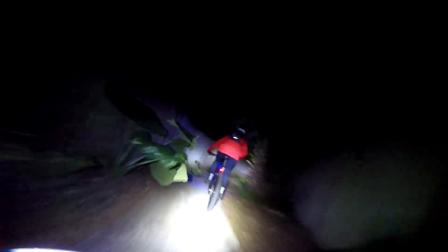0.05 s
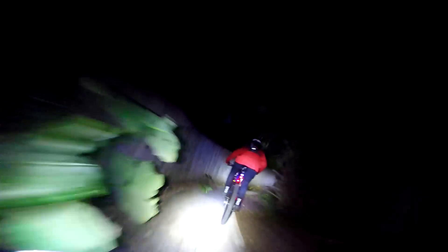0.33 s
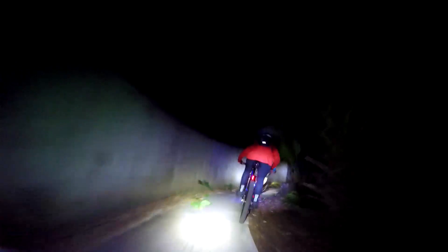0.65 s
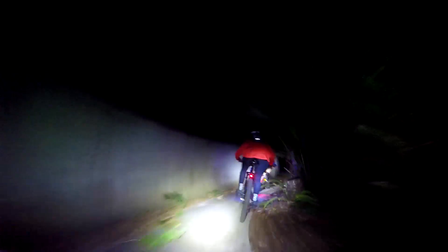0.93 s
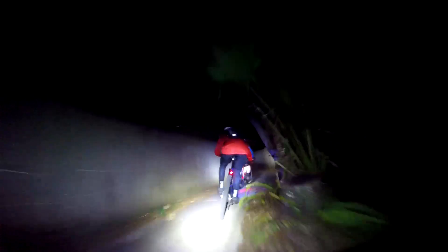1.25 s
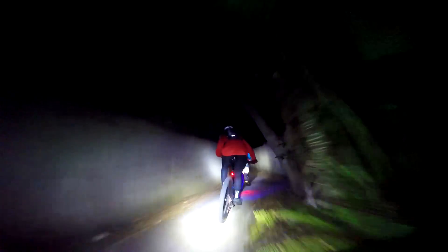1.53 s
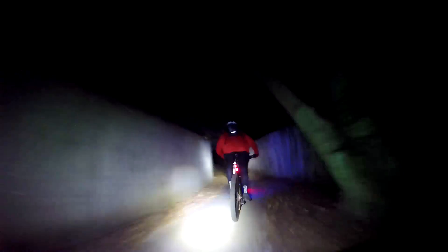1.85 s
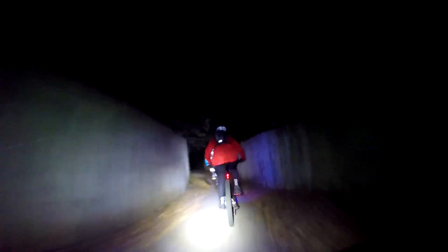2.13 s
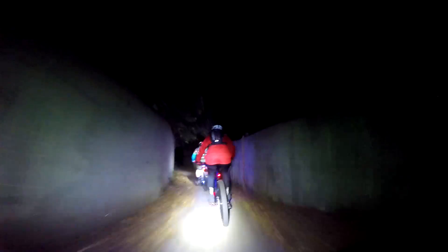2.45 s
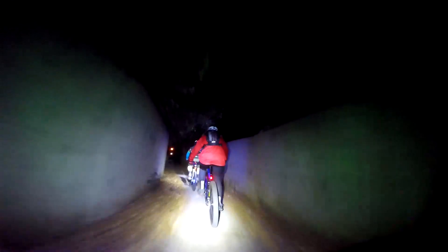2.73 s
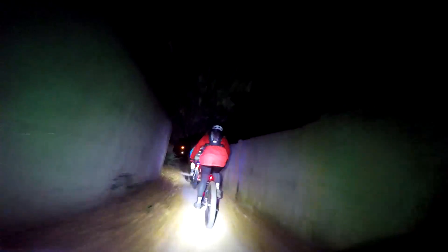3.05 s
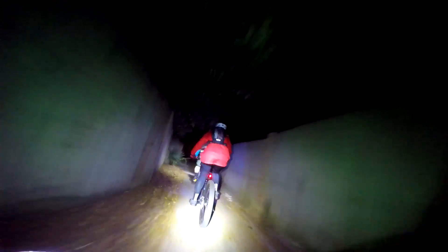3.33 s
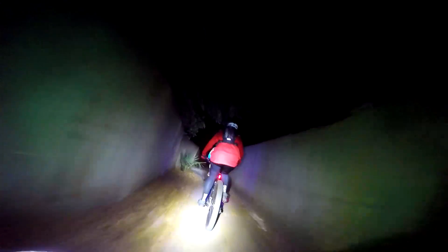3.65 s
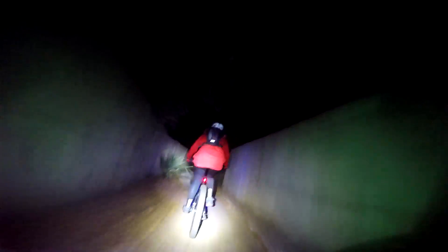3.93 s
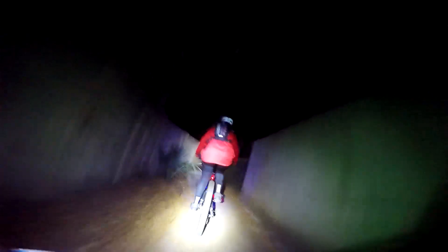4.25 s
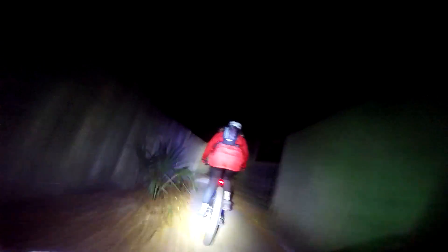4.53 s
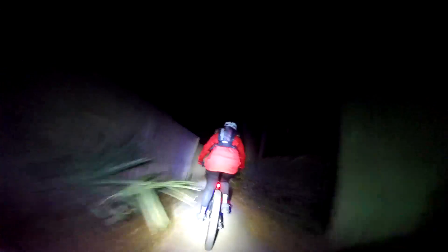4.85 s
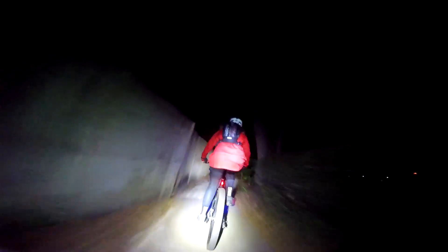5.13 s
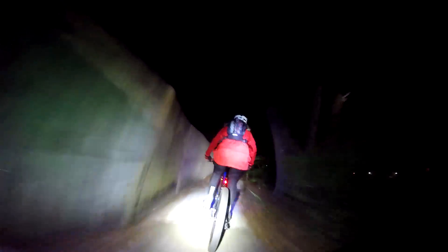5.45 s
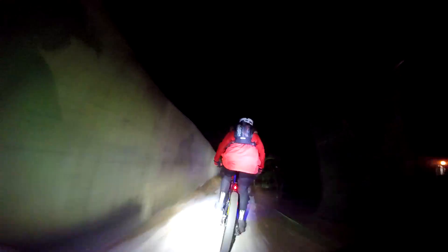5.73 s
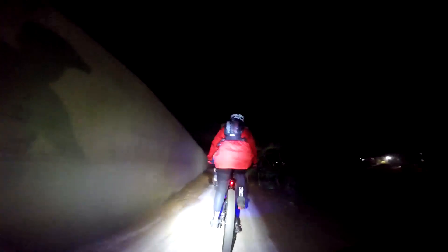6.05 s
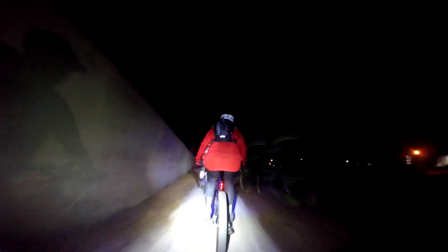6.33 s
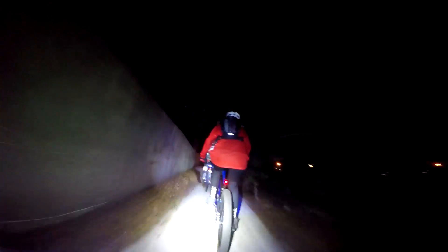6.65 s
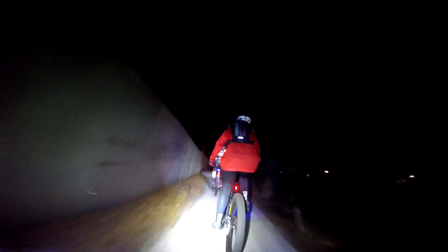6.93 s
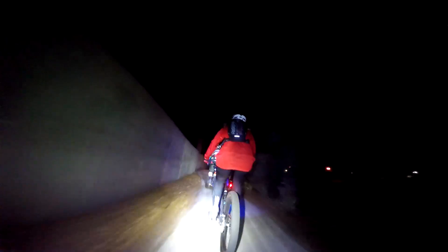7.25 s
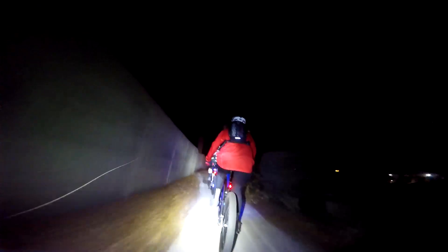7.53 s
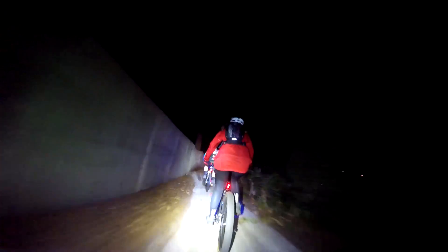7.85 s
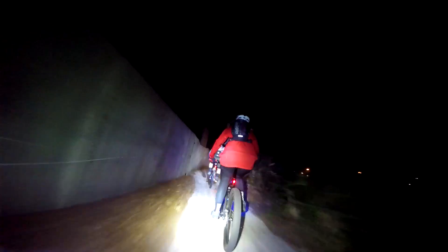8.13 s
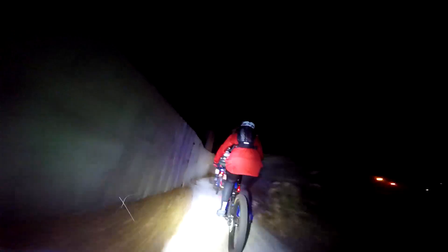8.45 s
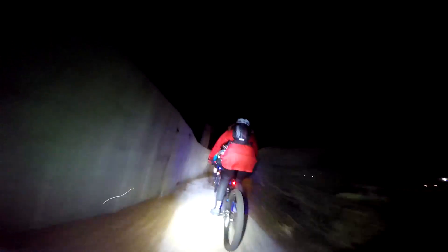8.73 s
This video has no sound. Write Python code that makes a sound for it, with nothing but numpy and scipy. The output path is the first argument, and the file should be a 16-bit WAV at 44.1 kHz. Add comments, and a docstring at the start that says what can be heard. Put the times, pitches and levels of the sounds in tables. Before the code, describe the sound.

A mountain bike rolls fast over damp paving, knobby tyres humming, with thudding bumps, gear clicks and wind rumbling on the microphone.

```python
"""On a damp paved path between concrete walls, a mountain bike rolls fast, heard from its handlebar.
Knobby tyres force the frame into vibration and fling off a hiss of spray; the freehub's pawls buzz,
and turbulent air buffets the microphone. Impacts excite damped modes: bumps thud, grit ticks, loose
parts clatter, the gears shift and the frame knocks. Friction adds the swish of passing plants and
one scrape of a brake rotor."""
import sys
import numpy as np
from scipy.fft import rfft, irfft, next_fast_len
from scipy.io import wavfile
from scipy.ndimage import uniform_filter1d, minimum_filter1d, map_coordinates

SR = 44100
rng = np.random.default_rng(int(sys.argv[2]) if len(sys.argv) > 2 else 0)


def materialize(psi):
    """Save the field psi as 16-bit PCM at rate SR to the path in sys.argv[1].

    A 1-D psi becomes a single channel; in a 2-D psi each row is a channel.
    """
    bounded = np.clip(np.atleast_2d(psi).T, -1, 1)
    quanta = np.round(bounded * 32767).astype(np.int16)
    wavfile.write(sys.argv[1], SR, quanta)


N = 392490

ROLLING = [(0, -29), (0.15, -31), (0.51, -29.5), (0.53, -44), (0.7, -39.5), (1.05, -35.5), (1.25, -39.5),
           (1.55, -34.5), (2.25, -34.5), (2.85, -29), (3.25, -31.5), (4.14, -28.5), (4.17, -38.5),
           (4.85, -36), (5.24, -31.5), (5.27, -41.5), (5.8, -35.5), (6.7, -29.5), (7.4, -28.5),
           (7.55, -32.5), (8.1, -30.5), (8.88, -29.5)]  # how hard the tyres work the ground: t/s, level/dB
TREAD = [(0, 110.6, 15), (1.4, 137, -15.5), (2.3, 103, -16.5), (3.1, 111, 7.5), (3.9, 137, 1),
         (4.4, 136, 2.5), (5.5, 132, 2), (6.3, 129.7, 3.5), (7.2, 128, 9), (8.1, 132, 6.5),
         (8.9, 123, -12.5)]  # knob impacts: t/s, nominal rate/Hz, relative hum level/dB
KNOB_HARMONICS = [-3.5, -2.5, -12, -9, -10.5, -10]  # knob force at harmonics 1-6: level/dB
ANTIRESONANCES = [(118, 3.6), (243, 7.7), (481, 9.8)]  # where the frame barely responds: f/Hz, width/Hz
BOOM_MODES = [(46, 6, -7), (72, 14, -10), (104, 8, 1), (131, 9, -5), (145, 15, 3), (165, 20, -3),
              (205, 30, -13.5)]  # low resonances of frame, fork and tyre: f/Hz, width/Hz, level/dB
DRONE_MODES = [(258.8, 11, -0.5), (284, 23, -4), (325.5, 55, -14), (429, 34.4, -11.5), (522, 30, -5.5),
               (550, 26, -11), (662, 61, -15), (799, 37, -10), (1037, 100, -13.5), (1128, 57, -18)]  # their upper resonances: f/Hz, width/Hz, level/dB
BOOM_LEVEL = [(0, -18.5), (0.45, -15), (0.75, -25.5), (1.0, -18.5), (1.35, -25), (1.6, -20), (2.5, -19),
              (2.8, -16), (3.4, -21), (3.9, -14.5), (4.03, -18.5), (4.13, -16), (4.3, -21.5), (5.2, -19),
              (5.9, -23.5), (6.25, -19), (6.7, -15), (7.8, -18), (8.2, -16), (8.35, -20.5), (8.8, -14)]  # low boom, following the unevenness of the paving: t/s, level/dB
DRONE_LEVEL = [(0, -26), (0.27, -24), (0.51, -27.5), (0.56, -32.5), (1.0, -32.5), (1.3, -33.5), (2.1, -30),
               (2.65, -33), (2.85, -24.5), (2.98, -29), (3.2, -28), (3.5, -21.5), (3.77, -26),
               (4.14, -22.5), (4.19, -32.5), (4.9, -33), (5.13, -24.5), (5.3, -32.5), (5.7, -27.5),
               (5.82, -29), (6.1, -26.5), (6.86, -21.5), (7.55, -23), (8.1, -21), (8.88, -24.5)]  # the tread's drone in the frame: t/s, level/dB
# the tread's whine, swelling as the wheel turns and flaring at hard knocks to the frame: t/s, level/dB
WHINE_LEVEL = [(0.0, -44), (0.17, -37), (0.3, -41), (0.49, -34), (0.59, -57), (0.72, -48), (0.94, -41),
               (1.26, -51), (1.36, -38), (1.41, -51), (1.58, -37), (1.68, -45), (2.3, -43), (2.85, -34.5),
               (3.0, -44), (3.05, -28.5), (3.15, -41.5), (4.14, -35), (4.19, -50), (4.51, -48),
               (4.54, -36.5), (4.64, -47.5), (5.23, -41), (5.28, -50), (5.87, -40.5), (7.46, -37),
               (7.51, -44), (7.98, -39.5), (8.03, -34), (8.33, -42), (8.35, -48), (8.4, -31.5), (8.7, -44),
               (8.9, -37)]
RUSH_SPECTRUM = [(300, -32.5), (600, 1.5), (900, 1), (1050, -6), (1350, -7), (1650, -14), (2200, -15),
                 (4000, -48)]  # tread slapping the ground: f/Hz, level/dB
WHINE_HZ, WHINE_HALF_WIDTH_HZ = 546, 62
LOAD_SWAY, LOAD_SWAY_HZ = 0.009, 5  # fractional pitch deviation; its rate

THROW = [(0, -48.5), (0.51, -52.5), (0.53, -58), (1.0, -54), (1.22, -56), (1.4, -52), (1.9, -49.5),
         (2.05, -62), (2.97, -56.5), (3.06, -51.5), (3.25, -50.5), (3.5, -46.5), (4.14, -45), (4.17, -54),
         (5.12, -50.5), (5.24, -54.5), (5.27, -61.5), (5.5, -59.5), (5.88, -57), (5.94, -54.5), (6.75, -52),
         (7.7, -55.5), (8.05, -50), (8.5, -54), (8.88, -50)]  # water and sand thrown by the tread: t/s, level/dB
SCRUB_SPECTRUM = [(1000, -13.5), (1700, -7.5), (2100, -4), (2420, 0), (2680, -4), (3050, -5.5), (3450, -10),
                  (4300, -13.5), (6000, -16), (11000, -48.5)]  # sand under the tread: f/Hz, level/dB
SPRAY_SPECTRUM = [(3000, -36.5), (4400, -19.5), (4950, -2), (5300, 0.2), (5850, -0.5), (6200, -3),
                  (6520, 0.5), (6900, -3.5), (7600, -7.5), (8600, -29.5)]  # flying droplets: f/Hz, level/dB
MIST_SPECTRUM = [(6500, -30), (7800, -3), (8500, -1), (9400, -2), (9900, -7.5), (10350, -7.5),
                 (11100, -24.5), (11800, -42)]  # fine mist: f/Hz, level/dB

COASTS = [(0, 0.512, -53.5), (3.05, 4.15, -55), (4.45, 5.25, -62)]  # spells of freehub buzz: start/s, end/s, level/dB
HUB_MODES = [(1395, 40, 6), (2400, 100, 1.5), (6700, 170, -1), (10000, 170, -17)]  # resonances of the hub shell: f/Hz, width/Hz, level/dB
PAWL_HZ, PAWL_FADE_DB = 252, 15  # tick rate; fall of each tick before the next

BREEZE = [(0, -25.5), (1.0, -36), (1.45, -35), (2.1, -26.0), (2.6, -32), (3.3, -29.5), (5.2, -30),
          (5.9, -37), (6.7, -26.5), (8.3, -33), (8.88, -33.5)]  # steady airflow on the microphone: t/s, level/dB
GUSTS = [(0.57, -13), (0.79, -16), (1.19, -10), (1.62, -18), (2.0, -9), (2.24, -13), (3.14, -11.5),
         (3.66, -23), (4.21, -9.5), (4.42, -11), (4.9, -8.5), (5.31, -12.5), (5.52, -17), (6.08, -22),
         (6.37, -16), (6.58, -12.5), (6.78, -15), (7.47, -10.5), (7.66, -17), (8.52, -18), (8.74, -15)]  # single eddies, most at a jolt: t/s, level/dB
BUFFET_SPECTRUM = [(8, -45), (17, -6.5), (25, 1.5), (36, -3), (46, 13.5), (56, -19.5), (90, -13),
                   (200, -32), (600, -92.5)]  # turbulent pressure: f/Hz, level/dB

BUMPS = [(0.215, -8, 161.5, -22, -52), (0.539, -6.5, 139.3, -15, -33), (0.555, -6.5, 105, -11, -60),
         (1.175, -4.5, 139, -14, -39), (1.525, -9.5, 154, -16, -48), (1.87, -6.5, 150, -17, -40),
         (1.98, -4, 164.5, -14, -55), (2.019, -1.5, 97, -11, -37), (2.092, -4.5, 206, -12, -33.5),
         (2.625, -8.5, 142, -22, -55), (2.865, -10, 200, -22, -51), (3.036, -3.5, 218, -25, -30),
         (3.126, -4, 163, -18, -39), (4.2, -9.5, 157, -4, -39), (4.416, -12.5, 188, -3, -33),
         (4.894, -11.5, 106.5, -16, -51), (5.293, -6, 142, -19, -34), (6.362, -4.5, 148, -8, -57),
         (6.68, -10, 142, -17, -54), (7.01, -4.5, 150, -11, -51), (7.095, -8, 140, -18, -56),
         (7.21, -4, 141, -18, -52), (7.385, -2.5, 146.5, -16, -43), (7.479, -6, 175, -14, -54),
         (7.635, -3, 147, -17, -38), (7.93, -7, 143, -16, -49), (8.115, -10.5, 170, -20, -50),
         (8.178, -9, 159, -18, -37), (8.21, -4, 136, -16, -55), (8.409, -8, 214.7, -24, -35),
         (8.497, -3.5, 148.5, -5, -39)]  # jolts: t/s, level/dB, tyre f/Hz, relative fork heave/dB, rattle/dB
SLAB_EDGES = [(0.509, 0.522, -8), (4.156, 4.184, -3), (5.248, 5.28, -3.5)]  # the tyre skips off an edge: lift/s, landing/s, gain/dB
SNAPS = [(0.51, -12), (5.247, -28)]  # dead snaps as the tyre lifts: t/s, level/dB
GRIT = [(.517, -41, 0.013), (.557, -39, 0.02), (1.876, -37.5, .02), (2.188, -44, 0.035), (2.371, -45, .03),
        (3.015, -40, 0.033), (3.1015, -30.5, 0.004), (3.189, -39, 0.022), (3.706, -38, 0.03),
        (3.7745, -41, .015), (4.0994, -33, 0.025), (4.272, -40, .012), (6.893, -41, 0.02),
        (7.705, -42.5, .05)]  # stones flicked against the frame: t/s, level/dB, T60/s
CLATTERS = [(0.541, -39), (1.876, -30), (2.021, -51), (4.198, -47), (4.272, -41), (5.218, -46),
            (5.292, -42.5)]  # loose parts set chattering: t/s, level/dB
CLATTER_GAP_S, CLATTER_LOSS_DB, CLATTER_T60_S = 0.0045, 5.5, 0.018  # typical values per contact

LEVER_CLICKS = [(.765, -24), (1.394, -20.5), (1.931, -32), (2.322, -29.5), (3.014, -34), (4.185, -31.5),
                (4.391, -24.5), (5.091, -28), (5.4855, -23)]  # the shifter lever snaps: t/s, level/dB
LEVER_MODES = [(865, 3, 0.034), (1143, 5.5, 0.014), (1240, -5, 0.013), (1380, -4, 0.02)]  # modes of the lever: f/Hz, level/dB, T60/s
CHAIN_DROPS = [(.801, -12), (4.422, -7), (5.519, -11)]  # the chain lands on a cog: t/s, level/dB
DRIVETRAIN_MODES = [(228, 1, 0.056), (340, 0, 0.05), (431, -3, 0.058), (580, -6, 0.03), (770, -3, 0.03),
                    (830, 1, 0.045), (1194, -13, 0.03), (1370, -7, 0.016)]  # modes of the drivetrain: f/Hz, level/dB, T60/s

SWISHES = [(1.894, -53, 0.016), (2.792, -42.5, 0.013), (3.077, -43.5, 0.0033), (4.783, -45, 0.01),
           (4.849, -44, .007), (4.892, -43, 0.015), (5.013, -47, 0.0045), (6.718, -46, 0.0065)]  # plants brush the bike: t/s, level/dB, half-length/s
KNOCKS = [(3.039, -25), (8.184, -34), (8.409, -17)]  # hard jolts to the frame: t/s, level/dB
TUBE_MODES = [(410, -9, .04), (596, 1, 0.13), (748, 0, 0.064), (1068, -3.5, 0.05), (1220, -7, .035)]  # modes of the frame tubes: f/Hz, level/dB, T60/s
PAD_GRAZES = [(5.378, -58)]  # a brake pad touches its rotor: t/s, level/dB
ROTOR_MODES = [(1925, 5, .6), (2360, -4, .3), (2760, 14, .05), (2930, 0, .15), (3714, -5, 0.25)]  # modes of the steel disc: f/Hz, level/dB, T60/s
CEILING, TOP_HZ = 0.82, 11600  # the limiter's threshold and the camera's band limit


def amp(db):
    """Amplitude ratio of a level in decibels."""
    return 10 ** (np.asarray(db) / 20)


def unit(x):
    """Normalisation to rms 1."""
    return x / np.sqrt(np.mean(x ** 2) + 1e-20)


def even(x, seconds):
    """Normalisation to a running rms of 1; faster flutter remains."""
    return x / np.sqrt(np.abs(uniform_filter1d(x * x, max(int(seconds * SR), 2))) + 1e-20)


def curves(rows):
    """Linear interpolation, sample by sample, of each column after the time."""
    s, *cols = np.transpose(rows)
    return [np.interp(np.arange(N) / SR, s, c) for c in cols]


def swing(rows):
    """Decomposition of a level curve into its mean and its deviation, in dB."""
    db, = curves(rows)
    return db.mean(), db - db.mean()


def wobble(hz):
    """Smooth random modulation: a spline through hz random knots a second."""
    knots = rng.standard_normal(int(N * hz / SR) + 4)
    grid = np.arange(0, len(knots) - 1, 1 / 16)
    return np.interp(np.arange(N) * hz / SR, grid, map_coordinates(knots, [grid]))


def swell(s, rise_s, fall_s):
    """Exponential growth to 1 at time s, then exponential decay."""
    t = np.arange(N) / SR
    return np.exp(-np.minimum(np.maximum((s - t) / rise_s, (t - s) / fall_s), 20))


def noise():
    """White Gaussian noise."""
    return rng.standard_normal(N)


def filtered(x, response):
    """Linear filtering: the spectrum of x times a frequency response."""
    size = next_fast_len(N + SR // 2)
    return irfft(rfft(x, size) * response(np.fft.rfftfreq(size, 1 / SR)), size)[:N]


def colour(x, points):
    """Spectral shaping by a curve of points: f/Hz, level/dB."""
    hz, db = np.transpose(points)
    return filtered(x, lambda f: amp(np.interp(np.log(f + 1), np.log(hz), db)))


def resonate(x, modes):
    """Forced response of parallel resonators, which cancel between neighbouring peaks."""
    return filtered(x, lambda f: sum(amp(db) * 1j * f * width / (hz * hz - f * f + 1j * f * width)
                                     for hz, width, db in modes))


def ring(modes, t):
    """Free vibration: a sum of damped modes, each struck with slightly random strength."""
    return sum(amp(db + rng.standard_normal() - 60 * t / t60) * np.sin(2 * np.pi * hz * t)
               for hz, db, t60 in modes)


def strike(modes, t, onset):
    """Impact response: free vibration under an onset envelope, scaled to peak 1."""
    sound = ring(modes, t) * onset
    return sound / np.abs(sound).max()


def add(track, s, sound):
    """Superposition of a sound on a track at time s."""
    part = track[max(round(s * SR), 0):][:len(sound)]
    part += sound[:len(part)]


def knob_phase(ratio):
    """Phase as the integral of frequency, here ratio times the unsteady knob rate."""
    knob_hz, _ = curves(TREAD)
    return 2 * np.pi * np.cumsum(knob_hz * ratio * (1 + 0.0118 * wobble(20))) / SR


def shaking():
    """Periodic knob forces and random roughness drive the frame, except at its antiresonances."""
    _, hum_db = curves(TREAD)
    phases = knob_phase(ratio=0.99), knob_phase(ratio=1.085)  # the two tyres differ in knob spacing
    knobs = sum(amp(db + 2.3 * wobble(12)) * np.sin(k * phase + rng.uniform(0, 2 * np.pi))
                for phase in phases for k, db in enumerate(KNOB_HARMONICS, 1))
    force = noise() + amp(hum_db - 28) * unit(knobs)
    return filtered(force, lambda f: np.prod([(hz * hz - f * f) / (hz * hz - f * f + 1j * f * width)
                                              for hz, width in ANTIRESONANCES], axis=0))


def swayed(x):
    """Frequency modulation: pitch wanders as the load on the tyre changes."""
    position = np.arange(N) + np.cumsum(LOAD_SWAY * wobble(LOAD_SWAY_HZ))
    return map_coordinates(x, [position], order=1, mode="mirror")


def tyres():
    """Forced vibration: the tyres drive the frame's resonances, while tread slap radiates a rush."""
    mean_db, roll_db = swing(ROLLING)
    boom_db, = curves(BOOM_LEVEL)
    drone_db, = curves(DRONE_LEVEL)
    whine_db, = curves(WHINE_LEVEL)
    overtone_db = mean_db - 9.5 + 0.88 * roll_db
    rush_db = mean_db - 13.5 + 0.56 * roll_db
    force = shaking()
    # soft rubber passes little treble to the frame
    boom = colour(resonate(force, BOOM_MODES),
                  [(30, -19.5), (70, 7.5), (230, 0), (330, -12), (450, -11.5), (1000, -52)])
    ringing = colour(swayed(resonate(force, DRONE_MODES)),
                     [(100, -29), (225, -4.5), (255, 11), (850, -5), (1300, -18), (3000, -39)])
    drone = filtered(ringing, lambda f: 1 / (1 + (f / 380) ** 16))
    whine = filtered(ringing, lambda f: 1 / (1 + ((f - WHINE_HZ) / WHINE_HALF_WIDTH_HZ) ** 8))
    frame = (amp(boom_db + 0.9 * wobble(10)) * even(boom, seconds=0.13)
             + amp(drone_db) * even(drone, seconds=0.18)
             + amp(whine_db) * even(whine, seconds=0.17)
             + amp(overtone_db) * even(ringing - drone - whine, seconds=0.25))
    rush_gain = amp(rush_db + 0.88 * wobble(7.5))
    slaps = noise() * amp(0.83 * wobble(70) + 1.6 * wobble(400))
    rush = rush_gain * unit(colour(slaps, RUSH_SPECTRUM))
    load_flutter = amp(1.04 * wobble(30))  # uneven paving varies the wheel load
    return load_flutter * (frame + rush)


def hiss(spectrum):
    """Fast random amplitude modulation gives a band of noise its grain."""
    grains = noise() * amp(1.8 * wobble(900))
    return unit(colour(grains, spectrum)) * amp(0.97 * wobble(45))


def spray():
    """Incoherent sources: droplets and sand sum to a hiss, lightly modulated by the knobs."""
    mean_db, throw_db = swing(THROW)
    _, roll_db = swing(ROLLING)
    chop = 1 + 0.11 * np.cos(knob_phase(ratio=0.82))
    sand = amp(-54.5 + 0.42 * roll_db + 0.57 * throw_db) * hiss(SCRUB_SPECTRUM)
    flicker = amp(0.25 * wobble(65))
    droplets = amp(mean_db - 0.53 + throw_db) * hiss(SPRAY_SPECTRUM)
    mist = amp(mean_db - 10 + 1.17 * throw_db) * hiss(MIST_SPECTRUM)
    return chop * (sand + flicker * (droplets + mist))


def freehub():
    """Pulse excitation: while the rider coasts, pawl ticks drive the hub shell's narrow resonances."""
    t = np.arange(N) / SR
    cycle = np.cumsum(PAWL_HZ * (1 + 0.028 * wobble(8))) / SR % 1
    ticks = noise() * amp(-PAWL_FADE_DB * cycle)
    buzz = unit(resonate(ticks, HUB_MODES))
    coasting = sum(amp(db) * ((t > start) & (t < end)) for start, end, db in COASTS)
    return uniform_filter1d(coasting, size=800) * amp(1.5 * wobble(12)) * buzz


def wind():
    """Turbulent pressure on the microphone: sudden eddies and a restless breeze add in power."""
    breeze_db, = curves(BREEZE)
    gusts = sum(amp(db) * swell(s, rise_s=0.013, fall_s=0.039) for s, db in GUSTS)
    eddies = even(colour(noise(), BUFFET_SPECTRUM), seconds=0.12)
    return np.hypot(amp(breeze_db + 2.2 * wobble(9.7)), gusts) * eddies


def bumps():
    """Damped oscillation: each bump rings the tyre, heaves the fork and rattles the cables."""
    thuds, shake, t = np.zeros(N), np.zeros(N), np.arange(SR // 3) / SR
    for s, db, hz, heave_db, rattle_db in BUMPS:
        tyre = amp(-60 * t / 0.16) * np.sin(2 * np.pi * hz * t)
        fork = amp(heave_db + 0.5 - 60 * t / 0.066) * np.sin(2 * np.pi * 42 * t)
        add(thuds, s, -amp(db + 1) * (1 - np.exp(-t / 0.0041)) * (tyre + fork))
        add(shake, s, amp(rattle_db + 5.5 - 60 * t / 0.19) * (1 - np.exp(-t / 0.00067)))
    rattle = colour(noise(), [(200, -24), (350, 14), (560, -2), (850, -1.5), (1200, -19),
                              (1500, -26), (2500, -23.5), (5000, -49)])
    return thuds + shake * even(rattle, seconds=0.11)


def ground_contact():
    """Rolling noise needs contact: its gain drops while the tyre is off the ground."""
    t = np.arange(N) / SR
    dip_db = sum(db * ((t > lift) & (t < land)) for lift, land, db in SLAB_EDGES)
    return amp(uniform_filter1d(dip_db, size=128))


def snaps():
    """A brief impulse has a broad spectrum: a sudden push snaps without ringing."""
    out, t = np.zeros(N), np.arange(SR // 100) / SR
    for s, db in SNAPS:
        add(out, s, amp(db) * np.exp(-t / 0.00076) * (1 + 0.15 * rng.standard_normal(len(t))))
    return colour(out, [(4000, -0.5), (7000, -5), (11000, -6)])


def grit():
    """Impact noise: small stones hit the frame, each a quickly decaying broadband tick."""
    ticks, t = np.zeros(N), np.arange(SR // 10) / SR
    for s, db, t60 in GRIT:
        add(ticks, s, amp(db - 60 * t / t60) * rng.standard_normal(len(t)))
    return colour(ticks, [(400, -5), (1200, 11.5), (2800, 7), (4200, 0.5), (6000, 1), (11000, -19)])


def clatter():
    """Inelastic collisions: chain and cables hit the frame in uneven, fading runs."""
    force, t = np.zeros(N), np.arange(SR // 10) / SR
    for s, db in CLATTERS:
        gaps = CLATTER_GAP_S * rng.uniform(0.56, 1.5, size=8)
        for k, delay in enumerate(np.cumsum(gaps) - gaps[0]):
            contact_db = db - CLATTER_LOSS_DB * k + 2 * rng.standard_normal()
            add(force, s + delay, amp(contact_db - 60 * t / CLATTER_T60_S))
    spectrum = [(500, -11), (1200, 9), (2400, 1), (4000, -16), (6500, -15), (10000, -24)]
    return force * unit(colour(noise(), spectrum))


def gears():
    """Structure-borne sound: lever clicks and chain drops lose treble on their way through the bar."""
    out, t = np.zeros(N), np.arange(SR // 4) / SR
    for s, db in LEVER_CLICKS:
        add(out, s, amp(db) * strike(LEVER_MODES, t, onset=1 - np.exp(-t / 0.0006)))
    for s, db in CHAIN_DROPS:
        add(out, s, amp(db - 4) * strike(DRIVETRAIN_MODES, t, onset=1 - np.exp(-(t / 0.002) ** 2)))
    return colour(out, [(1500, -1), (1850, -11), (3000, -10), (6000, -35)])


def plants():
    """Friction noise: leaves slide along the bike in short, bright swishes."""
    t = np.arange(N) / SR
    brushing = sum(amp(db) * np.exp(-0.5 * ((t - s) / half) ** 2) for s, db, half in SWISHES)
    spectrum = [(1200, -29), (2600, -3.5), (4300, -11), (5500, 3), (6700, 0.5), (8000, -8.5),
                (9400, -9), (11500, -29)]
    return brushing * unit(colour(noise(), spectrum))


def knocks():
    """Modal response: a hard jolt sounds the frame's damped tubes, and loose fittings judder."""
    tubes, t = np.zeros(N), np.arange(SR // 4) / SR
    for s, db in KNOCKS:
        add(tubes, s, amp(db) * strike(TUBE_MODES, t, onset=1 - np.exp(-t / 0.0021)))
    judder = sum(amp(db - 8) * swell(s, rise_s=0.0042, fall_s=0.013) for s, db in KNOCKS)
    fittings = colour(noise(), [(200, -12), (400, 1), (750, -1), (950, -2), (1200, -2.5),
                                (1550, -22), (3000, -37.5), (8000, -70)])
    return tubes + judder * even(fittings, seconds=0.03)


def rotor():
    """Frictional excitation: a pad scrapes the steel disc, which rings on faintly and unevenly."""
    disc, t = np.zeros(N), np.arange(SR // 2) / SR
    spectrum = [(1400, -28), (1900, 5), (2300, -5), (2850, 2), (3400, -7), (4100, -9), (5000, -31)]
    rasp = unit(colour(noise(), spectrum))
    for s, db in PAD_GRAZES:
        add(disc, s, amp(db) * (1 - np.exp(-t / 0.0023)) * ring(ROTOR_MODES, t))
    scrape = sum(amp(db + 15) * swell(s + 0.006, rise_s=0.008, fall_s=0.008) for s, db in PAD_GRAZES)
    return disc * amp(2 * wobble(90)) + scrape * rasp


def scene():
    """Superposition of all sources at the handlebar, in one channel."""
    rolling = ground_contact() * (tyres() + spray()) + freehub()
    transients = bumps() + knocks() + gears() + grit() + plants() + snaps() + clatter() + rotor()
    return (rolling + wind() + transients)[None]


def record(dry):
    """Limiting and low-pass filtering: the gain eases down at the loudest peaks, and the camera cuts the top."""
    needed = np.minimum(1, CEILING / (np.abs(dry[0]) + 1e-9))
    held = minimum_filter1d(needed, size=800)
    gain = uniform_filter1d(uniform_filter1d(held, size=400), size=400)
    return filtered(dry[0] * gain, lambda f: 1 / (1 + (f / TOP_HZ) ** 60))[None]


dry = scene()
out = record(dry)
materialize(out)
```